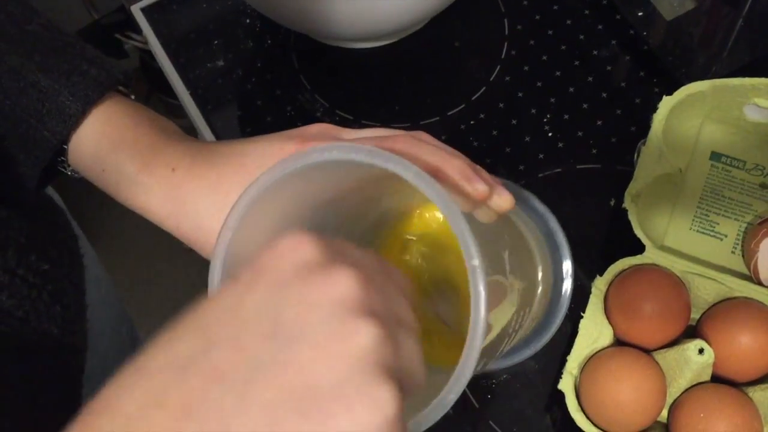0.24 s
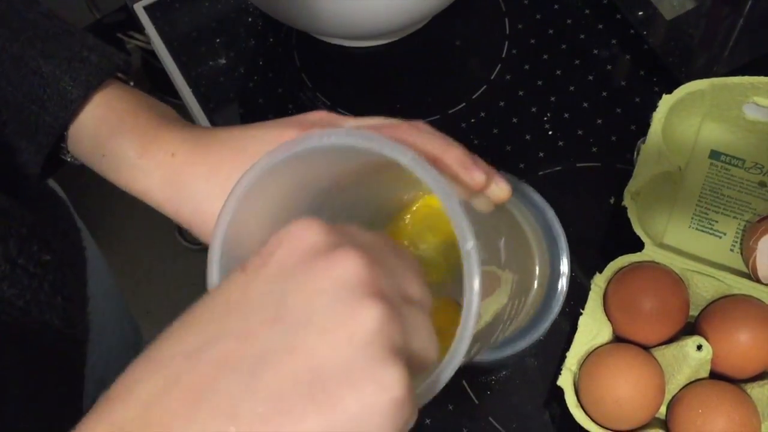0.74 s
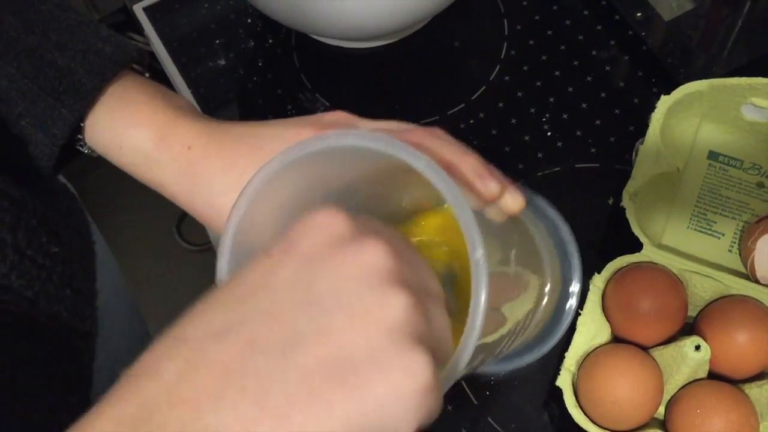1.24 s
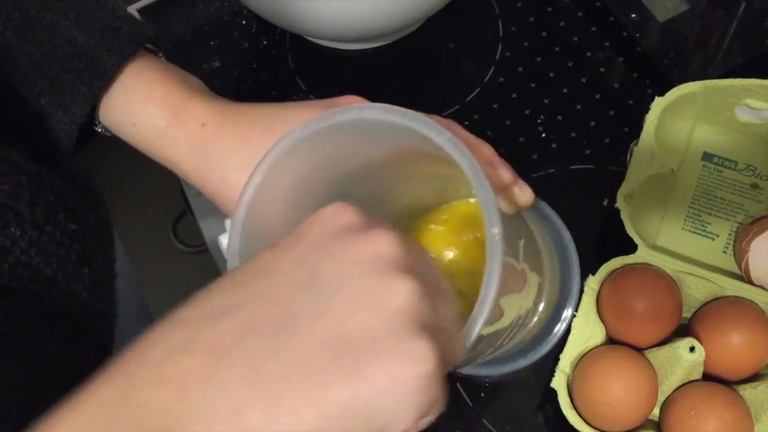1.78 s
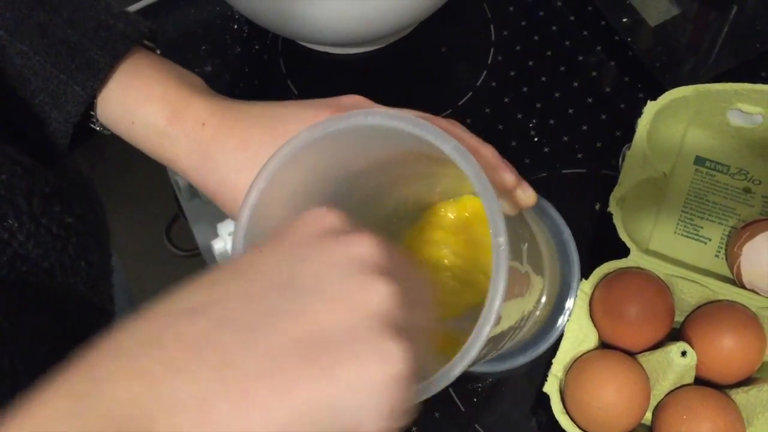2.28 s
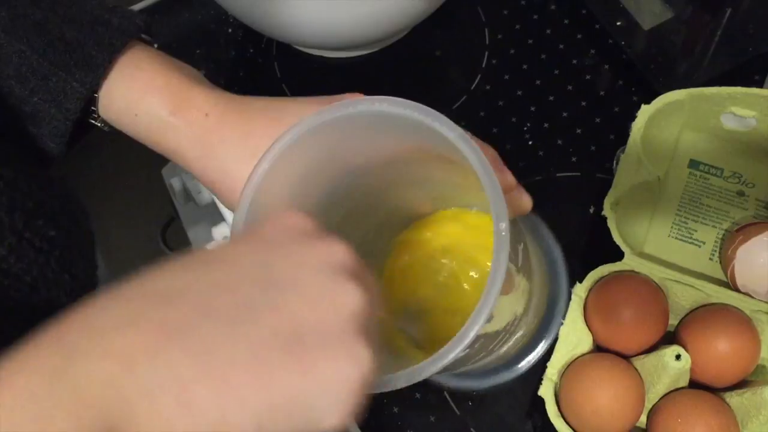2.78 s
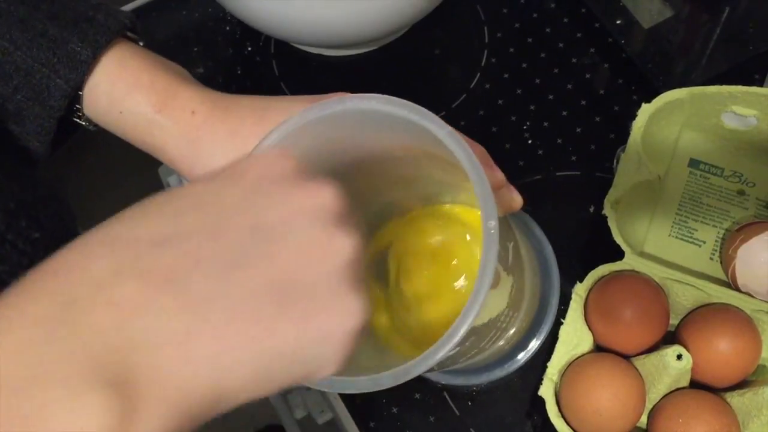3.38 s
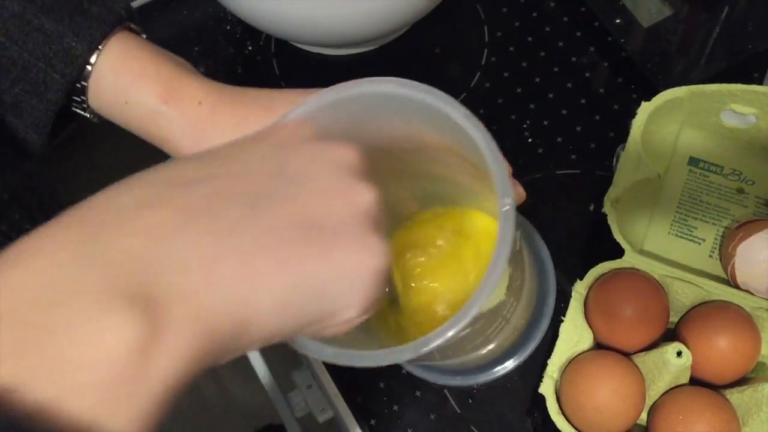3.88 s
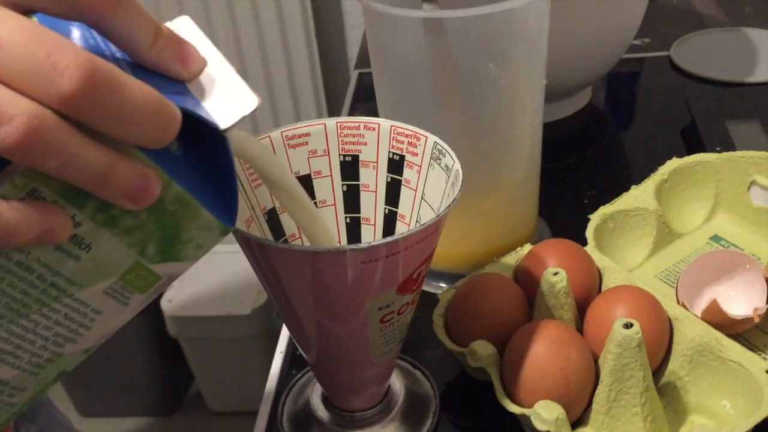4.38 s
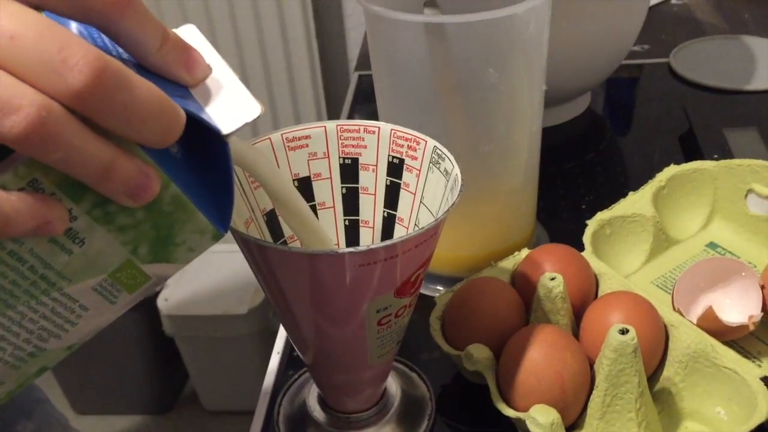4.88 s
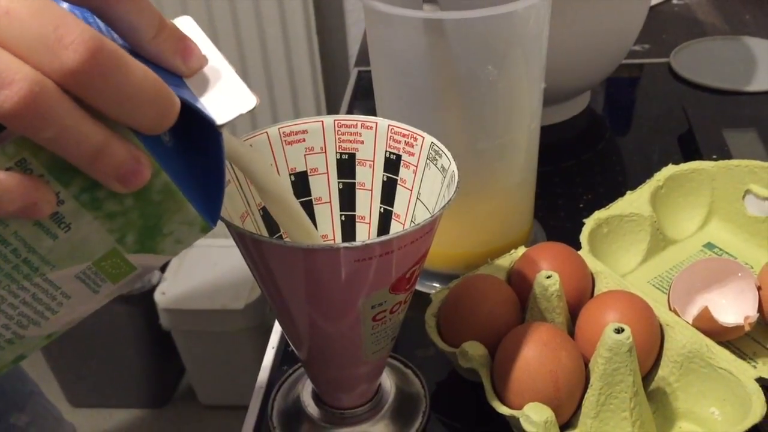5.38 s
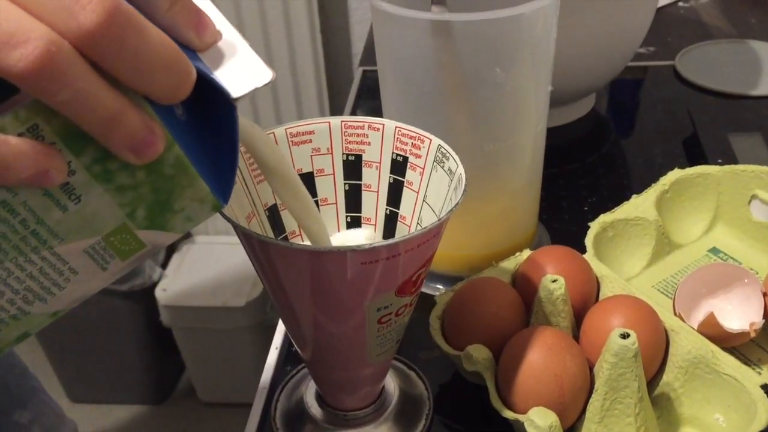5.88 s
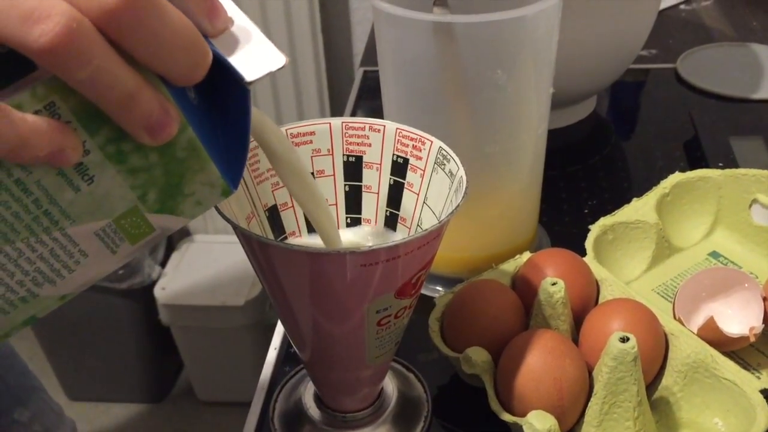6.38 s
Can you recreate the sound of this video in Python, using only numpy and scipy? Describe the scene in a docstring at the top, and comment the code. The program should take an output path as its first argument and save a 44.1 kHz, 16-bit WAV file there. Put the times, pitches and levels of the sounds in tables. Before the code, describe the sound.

From 0 to 4.2 seconds a fork briskly beats eggs in a tall plastic jug, close to the microphone. About four strokes a second, each a glancing knock followed within some 30 milliseconds by a harder crack: bright, dry, hollow plastic clatter, with brief metallic tine ring, a faint low hoot from the jug and a soft thud on the hob. Light ticks, brushing and wet, frothy egg crackle fill the gaps. The blows get harder after 2 seconds, strongest near 2.8 and 3.8. A low, airy extractor fan drones behind, and hard surfaces add a short echo. At 4.21 sound cuts out for about 0.05 seconds. From 4.26 to 6.6 the fan resumes and milk pours gently, far quieter, with tiny bubbling plips; around 5.05 to 5.4 there are dull carton knocks and a quick cluster of gulps, then a soft, smooth trickle until the end.

```python
"""A fork beats eggs in a tall plastic jug on a hob: decaying sines ring walls, tines, air column and base,
and each contact adds a burst of noise. After a short silence milk slides from a carton into a cone, made of
rising sines for bubbles and gulps, bursts of noise and a few ringing carton knocks.
Shaped noise makes the extractor fan, which drones before and after the silence; a small, hard kitchen
adds echoes and a short tail to the fork and the milk."""
import sys
import numpy as np
from scipy import signal
from scipy.fft import rfft, irfft
from scipy.io import wavfile
from scipy.ndimage import uniform_filter1d

SR = 44100
rng = np.random.default_rng(int(sys.argv[2]) if len(sys.argv) > 2 else 0)


def level_to_linear(level):
    """Convert decibel levels to linear amplitude factors, elementwise."""
    exponent = np.asarray(level, float) / 20
    return 10 ** exponent


def to_wav(sig):
    """Store sig (one row per channel, or 1-D mono) as 16-bit WAV at the path in sys.argv[1].

    Samples outside -1..1 are clipped; the rate is SR.
    """
    pcm = np.clip(np.atleast_2d(sig), -1, 1) * 32767
    pcm = np.round(pcm).astype(np.int16)
    wavfile.write(sys.argv[1], SR, pcm.T)  # frames by channels


N = 292716

BEATING_S = (0, 4.2)
HOOT_HZ = 483  # usual hoot of the air column
GLANCING_LOW_HZ = 950  # low wall pitch favoured by glancing blows
LIGHT_NEXT_HZ = 3050  # wall pitch that every light contact also rings
LIGHT_THUD_DB = -34  # base thud of a light contact, relative to its blow


def ring(modes, s, gains):
    """Sum of decaying sines over times s, each with its own gain."""
    hz, db, t60 = np.transpose(modes)[:, :, None]
    decay = np.exp(-np.log(1000) * s / t60)
    return (gains[:, None] * level_to_linear(db) * decay * np.sin(2 * np.pi * hz * s)).sum(0)


def band(x, lo_hz, hi_hz):
    """Band-pass filter."""
    return signal.sosfilt(signal.butter(2, [lo_hz, hi_hz], "band", fs=SR, output="sos"), x)


def add(out, at_s, x):
    """Mix x into out from time at_s."""
    i = int(at_s * SR)
    out[i:i + len(x)] += x[:len(out) - i]


def unit(x):
    """Scale to peak 1."""
    return x / np.abs(x).max()


def even(x):
    """Scale to unit energy."""
    return x / np.sqrt(np.sum(x ** 2))


def walk(rate):
    """Smoothed random drift of spread 1, with rate new values a second."""
    k = int(SR / rate)
    steps = np.repeat(rng.standard_normal(N // k + 1), k)
    x = uniform_filter1d(uniform_filter1d(steps, k), k)[:N]
    return x / x.std()


def colour(x, points, humps=()):
    """Shape the spectrum by (Hz, dB) points and (Hz, width Hz, dB) humps."""
    hz = np.arange(len(x) // 2 + 1) * SR / len(x) + 1
    points_hz, points_db = np.transpose(points)
    db = np.interp(np.log(hz), np.log(points_hz), points_db)
    db = db + sum(g * np.exp(-((hz - f) / w) ** 2) for f, w, g in humps)
    return irfft(rfft(x) * level_to_linear(db), len(x))


def plops(span_s, lo_hz, hi_hz, cycles, db, count):
    """Scattered small bubbles, mostly faint, each a few rising cycles; db is the faintest level."""
    out, s = np.zeros(N), np.arange(SR // 16) / SR
    for when, pitch, size in rng.random((count, 3)):
        hz = lo_hz * (hi_hz / lo_hz) ** pitch
        swell = np.exp(-s * hz / cycles) * (1 - np.exp(-s * hz * 2.0 / cycles))
        plop = np.sin(2 * np.pi * hz * s * (1 + 20 * s / cycles)) * swell
        add(out, span_s[0] + (span_s[1] - span_s[0]) * when, level_to_linear(db + 19.2 * size ** 3) * plop)
    return out


def fan():
    """Airflow noise with duct and motor humps, scaled to rms 1."""
    # airflow spectrum: pitch_hz, relative density_db per Hz
    airflow = [(20, -51.5), (42, -12.5), (55, -20), (90, -3.5), (190, -10.5), (260, -4.5), (370, -9.5),
               (450, -22), (730, -18), (1000, -37.5), (1400, -28.5), (2200, -34.5), (4500, -39),
               (7500, -50), (16000, -58)]
    # duct and motor humps: pitch_hz, width_hz, gain_db
    humps = [(99,12,6),(141,9.7,8),(254.8,1.2,8),(420,12,7),(835,110,-7.5),(1520,72,3.5)]
    air = colour(rng.standard_normal(N), airflow, humps)
    return air / air.std()


def whistles():
    """Faint narrow bands of noise that swell and vanish."""
    # whistling bands: pitch_hz, level_db (rms before the flicker)
    bands = [(872, -84.5), (1200, -79.5), (1460, -78), (1580, -82), (1700, -79.5), (2020, -79),
             (2250, -85.5), (2450, -85), (2740, -88.5)]
    out = np.zeros(N)
    for hz, db in bands:
        narrow = np.sqrt(N) * even(band(rng.standard_normal(N), hz - 19., hz + 19.))
        out += level_to_linear(db + 4. * walk(6) + 2.5 * walk(30)) * narrow
    return out


def egg_slosh():
    """Egg bubbles as rising sines, and the wet crackle of froth as cubed noise of drifting level."""
    out = plops(BEATING_S, 900, 5000, cycles=7.5, db=-61.5, count=500)
    out += plops(BEATING_S, 5970, 15000, cycles=4., db=-70, count=1500)
    fizz = band(rng.standard_normal(N) ** 3, 4500, 15500)
    return out + level_to_linear(-87 + 4.5 * walk(12) + 3.5 * walk(150)) * fizz


def light_contact(at, db, hz, treble_db):
    """A light glancing touch: its weak low ring, hoot and thud all follow its blow level."""
    return (at, db, (hz, LIGHT_NEXT_HZ, GLANCING_LOW_HZ), db - 43, HOOT_HZ,
            db + treble_db, db - 35.5, db + LIGHT_THUD_DB, False)


def ticks():
    """Light ticks of the tines."""
    # ticks: start_s, blow_energy_db, loudest_wall_hz, treble_db (relative to the blow)
    table = [(.002, -16.5, 2647, -18), (0.132, -6.5, 2030, -14), (2.756, -36, 4400, -3),
             (0.0394, -24, 2360, -22), (0.231, -15, 4380, -12), (0.2615, -7, 2455, -15),
             (.3794, -23, 2110, -11), (0.5125, -10, 2740, -17.5), (0.7445, -10, 2746, -16),
             (0.877, -25.5, 2040, -9.5), (0.993, -9.5, 3300, -16.5), (1.2456, -11, 2510, -24),
             (1.464, -4.5, 2950, -11), (1.723, -17, 2620, -21), (1.9766, -19.5, 2620, -22),
             (2.184, -23, 2150, -17.5), (2.2155, -21, 3200, -24), (2.314, -9, 2060, -25),
             (2.4621, -20, 2540, -19), (2.572, -16, 4400, -7), (3.18, -13.5, 3410, -13),
             (3.4371, -22, 2040, -17), (3.462, -5.5, 2300, -10), (3.701, -19, 2620, -22),
             (3.718, -7.5, 2330, -10.5), (3.806, -14.5, 2310, -13), (3.9738, -7.5, 2970, -13.5),
             (4.063, -21, 2330, -8), (4.093, -30, 4400, -9)]
    return [light_contact(*row) for row in table]


def rattle():
    """Tines brushing the wall at random moments and pitches, mostly faintly."""
    faintest_db, range_db, lo_hz, hi_hz = -38, 13, 2000, 4680
    return [light_contact(BEATING_S[1] * when, faintest_db + range_db * size ** 2,
                          lo_hz * (hi_hz / lo_hz) ** pitch, -14.)
            for when, size, pitch in rng.random((60, 3))]


def plunges():
    """Glancing blows that pump the air column; the base thud follows the hoot."""
    # plunges: start_s, blow_energy_db, loudest_wall_hz, next_wall_hz, hoot_peak_db, hoot_hz,
    # treble_db and low_wall_db (both relative to the blow)
    table = [(0.1195,-4,3050,2190,-28.5,489,-16,-18),(0.3566,-2.5,3060,2045,-28,491,-10.5,-18),(0.5854,-1.5,3200,3520,-24,480,-8.5,-18.5),
             (.836,-0.5,3100,2030,-26,490,-13.5,-18),(1.081,0,3100,2035,-29.5,488,-10,-17.5),(1.3125,-3,3210,2200,-31,477,-11,-19.5),
             (1.5416,-2.5,3140,4300,-27.5,478,-4.5,-17.5),(1.5826,-2.5,2580,3270,-23.5,468.8,-4.5,-17.5),(1.7897,-3,3110,2040,-29,490,-10.5,-24),
             (1.8156,-4.5,2900,3270,-28,467,-4.5,-18.5),(2.0372,-1.5,3140,2610,-29,487,-11,-21),(2.2812,-1.5,3180,3440,-30.5,482.5,-11,-22.5),
             (2.3005,-1.5,5090,4470,-23,478,-4,-20.5),(2.5325,2,4420,2920,-21.5,476,-4,-24),(2.9851,-4.5,4650,2510,-25,487,-7.5,-20.5),
             (3.251,-4,3220,2540,-29.5,480,-9.5,-20),(3.541,-1,3010,2290,-31,475,-9,-20),(3.7553,-6.5,3120,2540,-35.5,467,-11,-33.5),
             (4.0468,-13,2270,3000,-38.5,482,-16,-19)]
    thud_db = 3.5  # relative to the hoot
    return [(at, db, (hz, next_hz, GLANCING_LOW_HZ), hoot_db, hoot_hz,
             db + treble_db, db + low_db, hoot_db + thud_db, False)
            for at, db, hz, next_hz, hoot_db, hoot_hz, treble_db, low_db in table]


def cracks():
    """Square blows against the wall; harder ones thud more on the hob."""
    # cracks: start_s, blow_energy_db, loudest_wall_hz, next_wall_hz, low_wall_hz, hoot_peak_db, hoot_hz,
    # treble_db and low_wall_db (both relative to the blow)
    table = [(.145,4,2607,6000,1270,-33,473,-8.5,-10),(.391,-3,2730,2040,1300,-46,471,-13,-7.5),(0.6422,-12.5,4300,2790,1170,-63.5,484,-11,-10),
             (0.8902,4.5,2660,4070,1310,-31.5,472,-9,-11),(1.1225,0,2600,4020,1260,-35,482,-12.5,-11),(1.3609,-6,2670,4370,1150,-58,466,-11,-14.5),
             (1.6282,1,3304,2166,1360,-30,476.5,-3,-10.5),(1.8507,-4.5,2130,4620,1100,-35.5,471,-4.5,-10.5),(2.0827,5,2145,6100,1300,-34.5,439,-6,-9),
             (2.343,6,2780,6100,1310,-30.5,463,-6.5,-10),(2.5813,5,2765,6060,1293,-31,474,-1.5,-10),(2.7787,11.5,2410,4620,1530,-31,454,-3,-9),
             (3.048,7,2680,3350,1320,-31,456,-6.5,-11),(3.302,8.5,2868,4570,943,-37.5,440.2,-7,-14.5),(3.582,4,4020,3210,990,-38.5,491.2,-6.5,-14),
             (3.837,12,4380,4020,1450,-31,440,-2,-10.5),(4.106,3,2516,2910,1590,-40.5,422,-2,-7)]
    thud_db, thud_slope = -25.5, 0.54  # peak at a 0 dB blow, dB per dB of blow
    return [(at, db, (hz, next_hz, low_hz), hoot_db, hoot_hz,
             db + treble_db, db + low_db, thud_db + thud_slope * db, True)
            for at, db, hz, next_hz, low_hz, hoot_db, hoot_hz, treble_db, low_db in table]


def rebounds():
    """Dull square rebounds after a crack, all of one colour."""
    # rebounds: start_s, blow_energy_db
    table = [(1.882, -17), (2.1305, -16), (3.0899, -15), (3.3727, -11.5), (3.6401, -11), (3.8885, -10.5)]
    return [(at, db, (2620, LIGHT_NEXT_HZ, 1390), db - 39.5, HOOT_HZ,
             db - 12.5, db - 5, db + LIGHT_THUD_DB, True) for at, db in table]


def wall_rings(spots_hz, s):
    """Upper and low ring of the jug walls, favouring modes near the pitches of the spot that is hit."""
    # jug walls: pitch_hz (before a small random detuning), level_db,
    # t60_s (before upper rings are shortened and low ones slightly lengthened)
    wall_modes = [(755,-1,0.032),(972,3,0.014),(1184,-4,0.06),(1240,-1,0.046),(1356,-6.5,0.048),(1370,5.5,0.036),(1575,-2,0.026),(2040,-2.5,0.031),(2190,-4,0.039),(2354,-3.5,0.046),
                  (2540,-3,.035),(2620,-3.5,0.017),(2790,-8.5,0.028),(2890,-5.5,0.029),(3110,-6,.02),(3210,-2.5,0.016),(3540,-3.5,0.021),
                  (3950,-6,0.018),(4380,-5,0.023),(4620,-5,.016),(5250,-6.5,0.015),(5700,-14,0.014),(6060,-5,0.018)]
    modes = np.array(wall_modes)
    low = modes[:, 0] < 1800
    # grip and egg film detune the walls a little each time
    modes[:, 0] *= 1 + 0.008 * rng.standard_normal(len(modes))
    # upper rings are shortened, low ones slightly lengthened
    modes[:, 2] *= np.where(low, 1.1, 0.7)
    spot = rng.standard_normal(len(modes))
    gain_db = 2.75 * spot
    for hz, favour_db, width in zip(spots_hz, (15, 10, 15), (0.034, 0.039, 0.055)):
        gain_db += favour_db * np.exp(-(np.log(modes[:, 0] / hz) / width) ** 2)
    gains = np.sign(spot) * level_to_linear(gain_db)
    upper = band(band(ring(modes[~low], s, gains[~low]), 2100, 9000), 1900, 12000)
    return upper, ring(modes[low], s, gains[low])


def tine_chatter(x, s):
    """The tines land one after another and chatter, smearing the ring in time without recolouring it."""
    noise = rng.standard_normal((2, 900))
    # the fourth power leaves the later touches sparse
    touches = np.sign(noise[0]) * noise[1] ** 4 * np.exp(-s[:900] / 0.0032) * level_to_linear(-32)
    touches[0] = 1
    spectrum = rfft(touches, len(s))
    smear = irfft(spectrum / np.abs(spectrum))[:900]
    return signal.fftconvolve(x, smear)[:len(s)]


def tine_ring(s):
    """High ring of the fork's tines, each mode at a random strength."""
    # fork tines: pitch_hz, level_db, t60_s
    tine_modes = [(8000,-9,0.0084),(9250,1,0.021),(9670,-5.5,.02),(11900,-5,.015),(14400,2,0.017)]
    return even(ring(tine_modes, s, rng.standard_normal(len(tine_modes))))


def air_column(hoot_hz, s):
    """Hoot of the air coupled to the wall: a close pair that swells and then cancels, and a faint third mode."""
    # air column: pitch_hz (at the usual hoot), level_db, t60_s (pitch, level and t60 before random variation)
    column_modes = [(460.4, -1, 0.064), (501.5, 3.5, 0.046), (484, -14.5, 0.2)]
    modes = np.array(column_modes) * [hoot_hz / HOOT_HZ, 1, 1]
    # sloshing egg shifts each mode and shortens or lengthens its ring
    shift, stretch, level = rng.standard_normal((3, len(modes)))
    modes[:, 0] *= 1 + np.array([.007, .007, .02]) * shift
    modes[:, 2] *= np.exp(.3 * stretch)
    hoot = ring(modes, s, np.array([1, -1, 1]) * level_to_linear(1.5 * level))
    # the air takes several cycles to be pumped up
    return unit(hoot * (1 - np.exp(-s / 0.004)))


def base_thud(s):
    """Low thud of the jug on the hob, with a soft rise."""
    # jug on the hob: pitch_hz, level_db (before random variation), t60_s
    thud_modes = [(171, -1.5, 0.088), (136.5, -19.5, 0.23), (247, -3, 0.051), (320.8, 0.5, 0.067),
                  (406, -17, 0.0043)]
    thud = unit(ring(thud_modes, s, level_to_linear(2.5 * rng.standard_normal(len(thud_modes)))))
    return thud * (1 - np.exp(-s / 0.011))


def taps():
    """Fork contacts, towards the microphone and all round: glancing blows ring more, square ones click more."""
    out, all_round, s = np.zeros(N), np.zeros(N), np.arange(SR // 6) / SR
    # summed over all directions a contact has an even colour
    click = 1. * (s == 0)
    even_upper = even(band(band(click, 1900, 5800), 1750, 8500))
    even_lower = even(band(click, 550, 1500))
    even_top = even(band(band(click, 5000, 16400), 3800, 16900))
    blows = ticks() + rattle() + plunges() + cracks() + rebounds()
    for at, wall_db, spots_hz, hoot_db, hoot_hz, treble_db, low_db, thud_db, square in blows:
        # click relative to wall ring, tine ring relative to bare treble, wall ring relative to click all round
        click_db, tines_db, room_ring_db = (0, -14, -4) if square else (-13, 0.5, 1)
        # a brief contact, then a faint scrape through the egg
        noise = rng.standard_normal((2, len(s)))
        contact = noise[0] * (np.exp(-s / 0.0022) + level_to_linear(-31.0) * noise[1] ** 2 * np.exp(-s / 0.025))
        sting = contact * (np.exp(-s / 0.0028) + level_to_linear(-22.5))  # the treble is mostly in the first instant

        upper_ring, lower_ring = wall_rings(spots_hz, s)
        upper_click = even(band(band(contact, 1900, 6900), 1700, 7000))
        upper = even(even(tine_chatter(upper_ring, s)) + level_to_linear(click_db) * upper_click)
        lower_click = even(band(contact, spots_hz[2] / 1.4, spots_hz[2] * 1.54))
        lower = even(even(lower_ring) + level_to_linear(-12) * lower_click)
        bare_treble = even(band(band(sting, 6300, 16500), 7000, 19000))
        treble = even(bare_treble + level_to_linear(tines_db) * tine_ring(s))
        column, thud = air_column(hoot_hz, s), level_to_linear(thud_db) * base_thud(s)

        tap = level_to_linear(wall_db) * upper + level_to_linear(low_db) * lower + level_to_linear(treble_db) * treble
        add(out, at, tap + level_to_linear(hoot_db) * column + thud)
        room_tap = level_to_linear(wall_db) * even(even_upper + level_to_linear(room_ring_db) * upper)
        room_tap += level_to_linear(low_db) * even(even_lower + level_to_linear(room_ring_db) * lower)
        room_tap += level_to_linear(treble_db) * even_top
        # the column points up, so the walls get less of it
        add(all_round, at, room_tap + level_to_linear(hoot_db - 4) * column + thud)
    return out, all_round


def bursting_bubbles(out, s):
    """Bubbles bursting on the milk: short sines gliding up, each with a tick of noise."""
    # bubbles: start_s, level_db, pitch_hz (before the glide), tick_peak_db
    bubbles = [(4.2994, -55, 8000, -61.5), (4.393, -57.5, 5920, -47), (4.471, -73, 3155, -55),
               (4.548, -58.5, 5630, -65.5), (4.6092, -53, 5040, -73.5), (4.8844, -50, 3170, -77),
               (4.978, -54, 5900, -68), (5.0194, -61, 3600, -58.5), (5.0475, -51, 12800, -54),
               (5.0695, -60, 4050, -52), (5.0948, -49.5, 6300, -56), (5.1505, -47, 11800, -49),
               (5.1678, -50, 7100, -43), (5.2007, -52, 13000, -52), (5.2295, -45, 3830, -70),
               (5.247, -47, 2920, -71), (5.695, -44, 9250, -53), (6.0194, -56, 3080, -76)]
    for at, db, hz, tick_db in bubbles:
        swell = np.exp(-s / 0.003) * (1 - np.exp(-s / 0.00022))
        glide = np.sin(2 * np.pi * hz * s * (1 + 5.0 * s)) * swell
        tick = unit(band(rng.standard_normal(len(s)) * np.exp(-s / 0.0069), 3600, 18000))
        add(out, at, level_to_linear(db) * glide + level_to_linear(tick_db) * tick)


def carton_knocks(out, s):
    """The carton flexes with dull knocks, its panel modes smeared by the crumple of the card."""
    # knocks: start_s, peak_db, favoured_pitch_hz
    knocks = [(4.554, -50, 2395), (5.07, -43, 2280), (5.183, -33, 2150), (5.401, -36, 2330)]
    # carton panels: pitch_hz, level_db, t60_s
    panels = [(1300,-9.5,0.032),(1837,0,0.045),(2150,1.5,0.023),(2330,-4.5,0.034),(2780,-13,.025),(3570,-10.5,0.027)]
    for at, db, hz in knocks:
        favour_db = 8.4 * np.exp(-(np.log(np.transpose(panels)[0] / hz) / 0.035) ** 2)
        gains = np.sign(rng.standard_normal(len(panels))) * level_to_linear(favour_db)
        knock = ring(panels, s, gains) * (1 - np.exp(-s / 0.0015))
        # the card gives in steps
        crumple = rng.standard_normal(400) ** 3 * np.exp(-s[:400] / 0.0037) * level_to_linear(-27)
        crumple[0] = 1
        add(out, at, level_to_linear(db) * unit(signal.fftconvolve(knock, crumple)))


def glugs(out, s):
    """Air gulping back into the carton: brief rising sines that swell and die."""
    # gulps: start_s, peak_db, pitch_hz (before the glide)
    gulps = [(5.164, -46.5, 1250), (5.179, -35.5, 876), (5.184, -37, 976), (5.198, -55, 1020),
             (5.188, -42, 1390), (5.204, -41, 870), (5.215, -42.5, 1000), (5.232, -60, 995),
             (5.236, -49, 1617), (5.249, -51, 890), (5.39, -50, 1300), (5.41, -55.5, 1300)]
    for at, db, hz in gulps:
        gulp = np.sin(2 * np.pi * hz * s * (1 + 1.7 * s)) * s * np.exp(-s / 0.0022)
        add(out, at, level_to_linear(db) * unit(gulp))


def milk():
    """Milk sliding into the cone: streams of tiny bubbles, bursts, carton knocks and gulps."""
    pouring_s, gurgle_s, s = (4.27, 6.6), (4.9, 5.35), np.arange(SR // 10) / SR
    out = plops(pouring_s, 1350, 2350, cycles=16.0, db=-71.5, count=450) * level_to_linear(2.8 * walk(5.01))
    out += plops(pouring_s, 1100, 7000, cycles=6.1, db=-76.5, count=400)
    bursting_bubbles(out, s)
    carton_knocks(out, s)
    # small gulps around the big ones
    out += plops(gurgle_s, 850, 2450, cycles=4.7, db=-70, count=50)
    glugs(out, s)
    return out


def kitchen(near, all_round, wet_db):
    """Near echoes of what faces the microphone; the diffuse tail of hard walls, treble dying first, of the rest."""
    # tail: pitch_hz, t60_s
    decays = [(200, 0.36), (800, 0.39), (2500, 0.33), (6000, 0.25), (12000, 0.15)]
    # hob, tiles, cupboards: delay_s, level_db
    reflections = [(.0021, -15), (.0048, -13.5), (.0086, -13), (.013, -19.5)]
    s, tail = np.arange(SR // 2) / SR, 0
    for hz, t60 in decays:
        noise = band(rng.standard_normal(len(s)), hz / 2.28, min(hz * 1.39, 17000))
        tail = tail + noise * np.exp(-np.log(1000) * s / t60)
    uneven = level_to_linear(2.0 * walk(250)[:len(s)] + 1.3 * walk(60)[:len(s)])
    tail = level_to_linear(wet_db) * even(tail * (1 - np.exp(-s / 0.011)) * uneven)
    echoes = np.zeros(SR // 20)
    for delay_s, db in [(0.00019, 0)] + reflections:  # direct sound first
        echoes[int(delay_s * SR)] = level_to_linear(db)
    return signal.fftconvolve(near, echoes)[:N] + signal.fftconvolve(all_round, tail)[:N]


def mic(x):
    """Causal microphone colour, from the cepstrum of its gain."""
    # microphone response: pitch_hz, gain_db
    response = [(30, -33), (70, -4), (120, 7.5), (7000, -8.5), (9300, -7), (10600, -12), (12500, -9),
                (16000, -12.5)]
    click = colour(1. * (np.arange(4096) == 0), response)
    cepstrum = irfft(np.log(np.abs(rfft(click))))
    cepstrum = cepstrum * np.r_[1, np.full(2047, 2), 1, np.zeros(2047)]  # fold to minimum phase
    return signal.fftconvolve(x, irfft(np.exp(rfft(cepstrum))))[:N]


def scene():
    """Beating, a moment of silence, pouring."""
    s = np.arange(N) / SR
    # the silence lasts from 4.211 to 4.262 s, with a short fade on either side
    before = np.clip((4.211 - s) / 0.00072, 0, 1)
    after = np.clip((s - 4.262) / 0.0078, 0, 1)
    drone, whistle = fan(), whistles()
    near, all_round = taps() + egg_slosh()  # the slosh joins both
    beating = whistle + mic(kitchen(near, all_round, wet_db=-13.5)) + level_to_linear(-52) * drone
    poured = milk()
    pouring = whistle + mic(kitchen(poured, poured, wet_db=-15)) + level_to_linear(-52.5) * drone
    return (before * beating + after * pouring)[None]


def low_pass(x):
    """Removes everything above the highest recorded frequency."""
    return signal.sosfilt(signal.butter(12, 16990, fs=SR, output="sos"), x)


def record(dry):
    """The loudest cracks overload the microphone a little, and the top is cut."""
    overload_peak = 0.6  # peaks are rounded towards this
    rounded = overload_peak * np.tanh(dry / overload_peak)
    top_cut = signal.cheby2(8, 50, 17000, fs=SR, output="sos")
    mix = signal.sosfilt(top_cut, rounded)
    return low_pass(mix)


dry = scene()
out = record(dry)
to_wav(out)
```